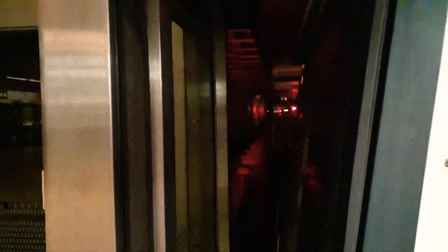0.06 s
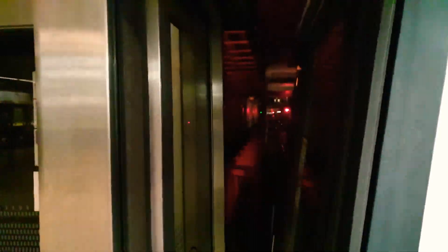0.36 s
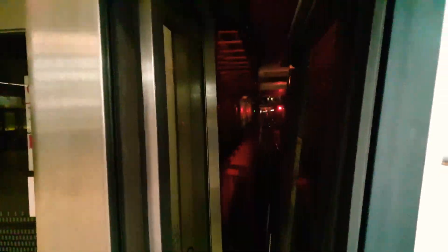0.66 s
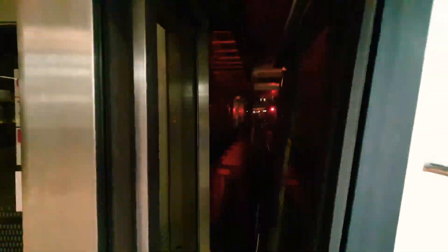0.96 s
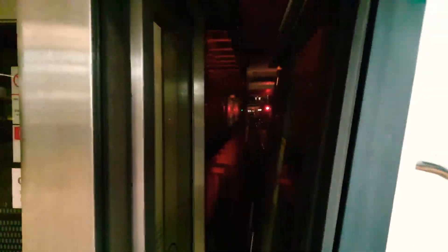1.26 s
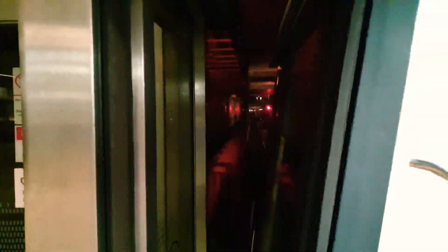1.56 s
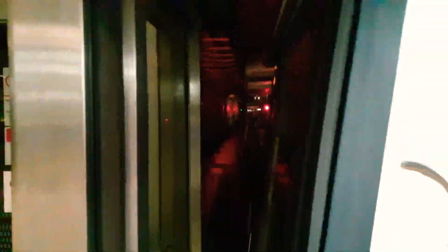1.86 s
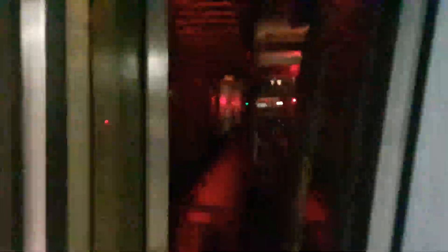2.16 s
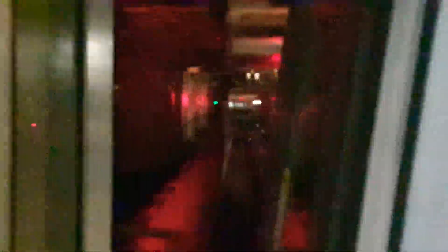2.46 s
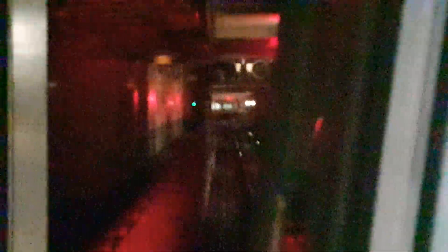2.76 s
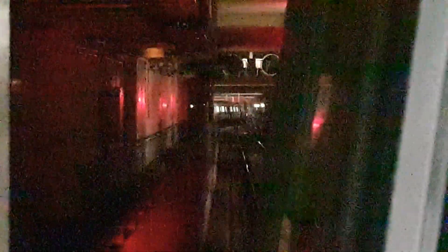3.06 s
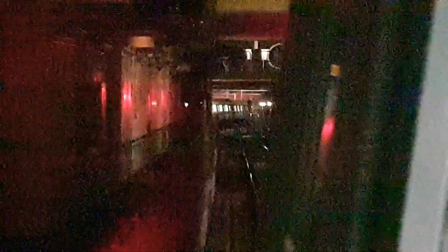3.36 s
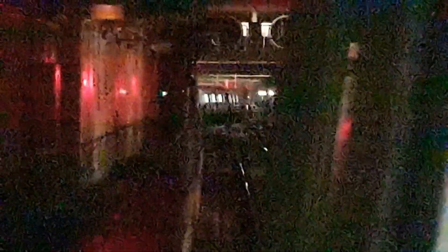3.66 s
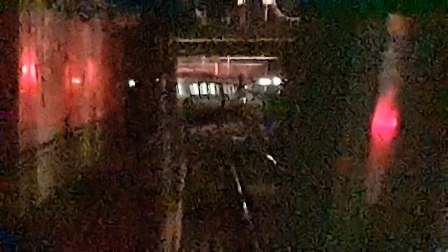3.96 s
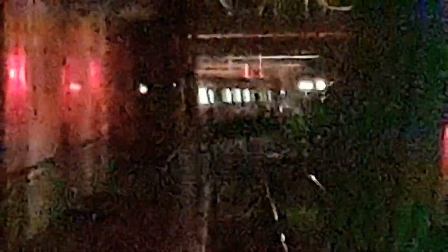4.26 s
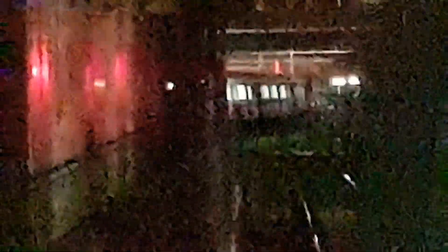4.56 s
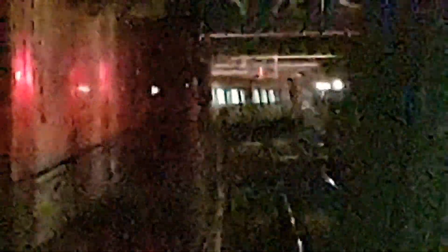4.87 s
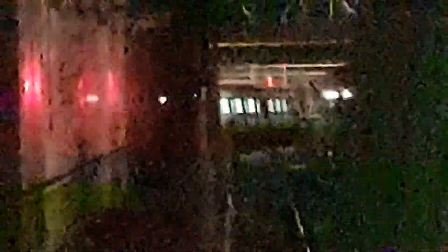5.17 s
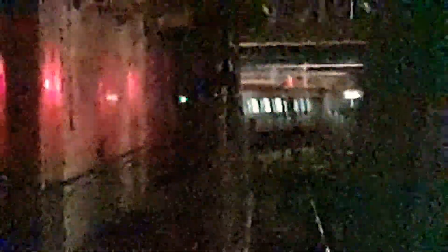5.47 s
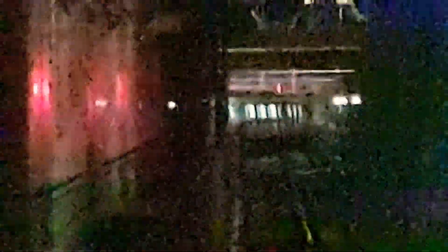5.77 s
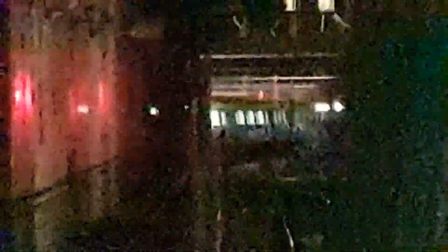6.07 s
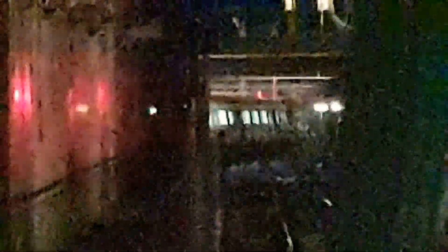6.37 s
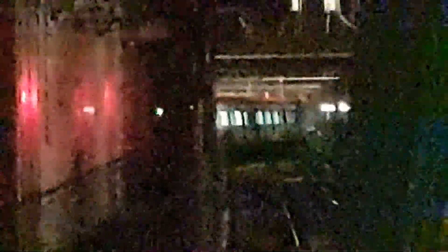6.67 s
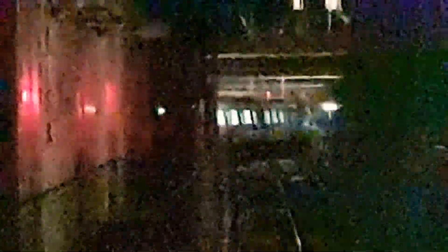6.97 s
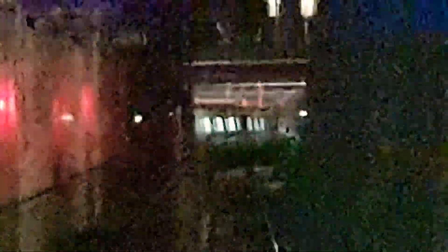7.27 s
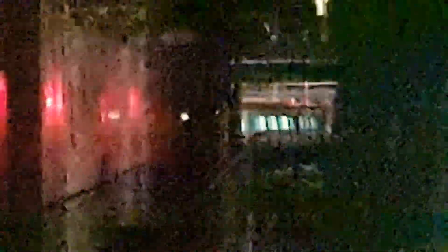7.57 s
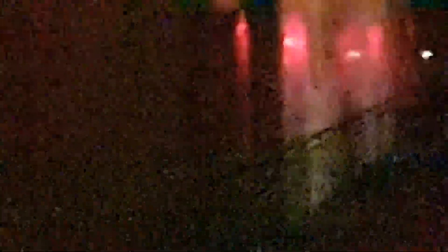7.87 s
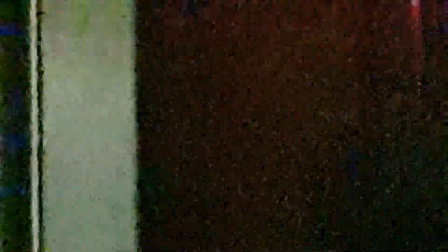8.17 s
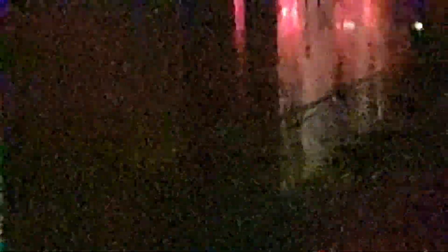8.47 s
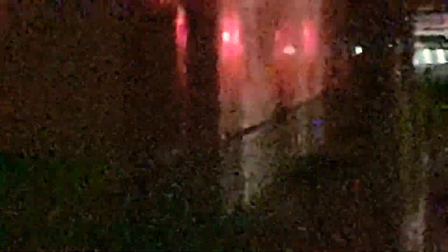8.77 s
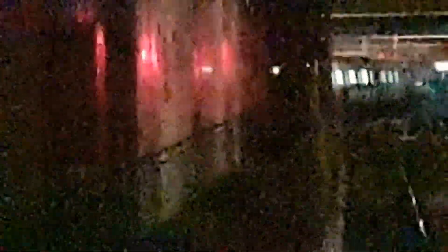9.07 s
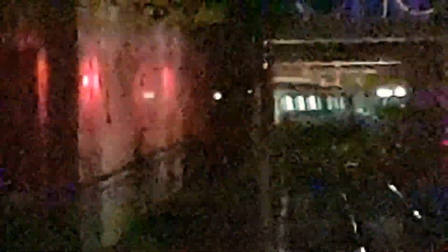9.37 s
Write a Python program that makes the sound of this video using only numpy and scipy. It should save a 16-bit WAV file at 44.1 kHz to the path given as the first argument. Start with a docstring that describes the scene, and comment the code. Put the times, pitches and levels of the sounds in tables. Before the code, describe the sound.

An electric metro train stands at an underground platform, heard from close beside a car. Its fans roar throughout, swelling gently about every two seconds over a low compressor drone and faint steady machine tones. A thin, high electrical whistle and sizzle waver, mostly on the right. Faint hissing scuffs come early. The drone grows from about four seconds, the clearest scuff comes near six, and a few more follow toward the end.

```python
"""An electric metro train stands at an underground platform, heard from beside a car. From the start,
turbulent fan air roars in slow surges over a compressor's drone and steady machine tones, while an
inverter sizzles and whistles at 8 kHz, louder and softer as the listener crosses its standing waves.
Faint hissing scuffs come from the right in the first seconds. After about 4 s the drone grows steadily;
near 5.8 s comes the strongest scuff, and more follow from 7 s on."""
import sys
import numpy as np
from scipy import signal
from scipy.fft import rfft, irfft, next_fast_len
from scipy.io import wavfile

SR = 44100
rng = np.random.default_rng(int(sys.argv[2]) if len(sys.argv) > 2 else 0)


def waveform_to_disk(signal):
    """Save audio, clipped to [-1, 1], as 16-bit WAV at the path in sys.argv[1]."""
    frames = np.transpose(np.atleast_2d(signal))
    scaled = np.clip(frames, -1, 1) * 32767
    samples = np.round(scaled).astype(np.int16)
    wavfile.write(sys.argv[1], SR, samples)


N = 415855
TIME = np.arange(N) / SR
FFT_SIZE = next_fast_len(N)
FREQS = np.maximum(np.arange(FFT_SIZE // 2 + 1) * SR / FFT_SIZE, 1)
EAR_SIGN = np.array([[1], [-1]])  # left, right
SHAFT_HZ = 24.35

# Base spectra of the fans' roar and the air's hiss. Each row: frequency in Hz, density in dB per Hz.
ROAR_SPECTRUM = [(15, -71), (30, -63), (48, -50), (62, -44.5), (85, -47), (115, -52), (145, -51.5),
                 (200, -45.5), (280, -47), (360, -53.5), (460, -58.5), (620, -57), (800, -61.5),
                 (1200, -66.5)]
HISS_SPECTRUM = [(1500, -70.5), (1900, -70), (2600, -78.5), (3800, -84), (5000, -90), (6000, -89.5),
                 (8600, -91.4), (9200, -90.5), (9700, -94), (12000, -94.5), (13700, -100.5), (14150, -92),
                 (14700, -100.8), (15600, -103.8)]
# Likeness of the fan noise at the two ears. Each row: frequency in Hz, correlation from -1 to 1.
EAR_COHERENCE = [(60, 0.65), (99, 0.94), (160, 0.95), (270, 0.99), (450, 0.86), (740, 0.89), (1220, 0.35),
                 (2010, 0.32), (3330, 0.11), (5500, 0.048), (9080, -0.01), (15000, -0.2)]
# Balance of the fan noise. Each row: frequency in Hz, left minus right level in dB.
EAR_BALANCE = [(60, 0.5), (200, -0.5), (500, 0.5), (1200, -0.5), (1900, -2.3), (3800, -3.5), (5200, -0.5),
               (9000, -2), (15000, -2)]
# Modes of the gap between car and wall. Each row: frequency in Hz, width in Hz, gain in dB (a null if < 0).
GAP_RESONANCES = [(210, 12.5, 3.5), (227, 16.3, -1.5), (265, 4.6, 4.3), (321, 15, 3), (562, 24, 1)]
# Fan surges, about 1.8 s apart. Each row: crest in seconds, width in seconds, roar and rush lifts in dB.
FAN_SURGES = [(-.1, .45, 2.5, 3.5), (1.65, 0.5, 4.2, 4.5), (3.25, 0.75, 4, 4), (5.15, 0.8, 3.5, 4),
              (6.9, 0.75, 4, 5), (8.62, 0.52, 3, 3.5)]
# Course of the tunnel's rumble. Each row: time in seconds, relative level in dB.
RUMBLE_LEVELS = [(0.0, -27), (1.25, -29), (1.7, -30.5), (2.56, -29), (3.96, -34), (4.31, -38),
                 (7.37, -32.5), (8.02, -39), (9.42, -38)]
# The inverter's whistle at each ear. Each row: time in seconds, relative level in dB.
WHISTLE_LEFT_LEVELS = [(0.0, -52.0), (0.39, -63.5), (2.01, -56.0), (2.57, -59.5), (2.96, -46.5),
                       (3.87, -59.0), (4.01, -53.5), (5.26, -60.0), (5.6, -51.5), (5.87, -59.5),
                       (8.46, -52.0), (9.42, -56.5)]
WHISTLE_RIGHT_LEVELS = [(0.0, -66), (0.46, -42), (0.91, -58), (1.2, -45.5), (1.37, -54.5), (2.74, -42.5),
                        (2.86, -49), (3.25, -47), (3.43, -43), (3.72, -56), (4.28, -47), (4.45, -42.5),
                        (4.8, -39), (5.02, -47.5), (5.26, -38), (6.51, -59), (7.29, -43), (7.88, -47.5),
                        (8.05, -43), (8.22, -52), (8.34, -41), (8.56, -59), (9.23, -44), (9.42, -50)]
# Spectrum of the inverter's sizzle. Each row: frequency in Hz, relative level in dB.
SIZZLE_SPECTRUM = [(5600, -18), (6250, -9), (6750, 0), (7500, 2), (8000, 1), (8300, -17), (8700, -32)]
# Compressor harmonics. Each row: multiple of the shaft rate, level in dB relative to the mean hum.
SHAFT_HARMONICS = [(2, -12), (4, -8.5), (5, -41)]
# Fan blade and transformer tones. Each row: frequency in Hz, left and right relative levels in dB.
STEADY_TONES = [(154.5, -41, -42), (285.5, -43, -42), (780.6, -47.5, -46), (831.7, -59, -52),
                (880.2, -49, -53), (905.7, -59, -52), (930, -52, -64), (1004, -54, -52), (1028.2, -53, -58),
                (1382.2, -55, -55), (1690.4, -64, -56), (2030.9, -71, -63), (2800.7, -67, -64),
                (4049.6, -74, -71), (4150.5, -80, -72), (7699.5, -71, -68), (11781.4, -84, -78),
                (11876.9, -80, -71), (11972.5, -82, -77), (12066.7, -80, -76), (12162.2, -76, -70)]
# Scuffs. Each row: peak time, rise and 60 dB decay time in seconds, nominal peak level in dB,
# lower and upper band edges in Hz.
SCUFF_BURSTS = [(.105, .04, .2, -52, 6000, 15000), (.23, .008, .1, -49, 3500, 5530),
                (.69, .002, .012, -44, 9500, 13000), (.82, .004, .03, -43, 3500, 6500),
                (2.40, .07, .5, -47, 3000, 12000), (5.838, 0.004, 0.14, -36.5, 2400, 13000),
                (5.88, 0.026, 0.51, -38.5, 1300, 15000), (7.2, .06, .35, -52, 9000, 13000),
                (7.792, .005, 0.26, -37, 7100, 8100), (7.797, .008, .6, -53, 10200, 10800),
                (7.87, .05, .3, -48, 5000, 14000), (8.2, 0.081, 0.41, -44, 3500, 12500),
                (8.265, 0.023, 0.45, -42, 3000, 14000), (8.99, 0.054, .4, -50, 5030, 6600)]


def fans(left_lead_s=.00008):
    """Turbulence radiates broadband noise; in a hard tunnel it is coherent in the bass, diffuse above."""
    mid, side = white_spectra()
    coherence = np.clip(across_hz(EAR_COHERENCE), -.99, .99)
    air = (np.sqrt(1 + coherence) * mid + EAR_SIGN * np.sqrt(1 - coherence) * side) / np.sqrt(2)
    base_db = across_hz(list(ROAR_SPECTRUM) + list(HISS_SPECTRUM))
    modes_db = sum(db / (1 + (2 * (FREQS - hz) / width) ** 2) for hz, width, db in GAP_RESONANCES)
    air = air * from_db(base_db + modes_db + EAR_SIGN * across_hz(EAR_BALANCE) / 2)
    air = air * np.exp(1j * np.pi * EAR_SIGN * FREQS * left_lead_s)
    rumble = unit_rms(from_db(in_time(RUMBLE_LEVELS)))
    roar, rush, hiss = surge_gains()
    low, middle, high, top = (1 / (1 + (FREQS / hz) ** 8) for hz in (68, 132, 390, 950))  # crossovers
    return (waveform(air * low) * rumble
            + waveform(air * (middle - low))
            + waveform(air * (high - middle)) * roar
            + waveform(air * (top - high)) * rush
            + waveform(air * (1 - top)) * hiss)


def surge_gains(roar_lag_s=0.084, hiss_share=0.18, rush_db_per_s=-0.31):
    """Slow amplitude modulation: each surge lifts the midrange rush and the hiss, then the low roar."""
    roar_db = rush_db = 0
    for crest, width, roar_lift, rush_lift in FAN_SURGES:
        roar_db += roar_lift * np.exp(-((TIME - crest - roar_lag_s) / width) ** 2)
        rush_db += rush_lift * np.exp(-((TIME - crest) / width) ** 2)
    return [unit_rms(from_db(db)) for db in (roar_db, rush_db + rush_db_per_s * TIME, hiss_share * rush_db)]


def inverter(switching_hz=8000, fade_hz=6.7, flutter=0.091, periodic_share=0.2, swell_above_db=-36.0):
    """Standing waves make the switching tone fade differently at each ear; a sizzle lies under it."""
    level_db = np.array([in_time(WHISTLE_LEFT_LEVELS) + 2 * drift(fade_hz),
                         in_time(WHISTLE_RIGHT_LEVELS) + drift(fade_hz)])
    tone = np.zeros((2, N))
    for ear in range(2):
        phase = wandering_phase(switching_hz, wander_hz=1.267) + flutter * drift(25)
        tone[ear] = np.sin(phase) * (1 + flutter * drift(23))
    whistle = np.sqrt(2) * tone * from_db(level_db + 4)
    # part of the sizzle repeats with each turn of the shaft
    period = round(SR / SHAFT_HZ)
    periodic = rng.standard_normal((2, period))[:, np.arange(FFT_SIZE) % period]
    aperiodic = rng.standard_normal((2, FFT_SIZE))
    ripple = np.sqrt(periodic_share) * periodic + np.sqrt(1 - periodic_share) * aperiodic
    sizzle = unit_rms(waveform(rfft(ripple) * from_db(across_hz(SIZZLE_SPECTRUM))))
    # it holds a diffuse floor, rising only if the whistle's level passes the threshold
    sizzle_db = -48.5 + 0.2 * np.maximum(level_db - swell_above_db, 0)
    return whistle + to_right(sizzle * from_db(sizzle_db), left_db=-5)


def compressor(motor_hz=73.9, grows_at_s=4.26, growth_db_per_s=1.04):
    """Rotation gives shaft harmonics and a motor hum, whose standing wave shifts between the ears."""
    hum_db = -29.9 + growth_db_per_s * np.maximum(TIME - grows_at_s, 0) + 0.5 * drift(0.5)
    shaft_phase = wandering_phase(SHAFT_HZ, wander_hz=0.083)
    motor_phase = wandering_phase(motor_hz, wander_hz=0.54) + 0.15 * drift(1.0) * EAR_SIGN
    drone = from_db(hum_db) * np.sin(motor_phase)
    for order, db in SHAFT_HARMONICS:
        harmonic_db = hum_db.mean() + db + 0.5 * drift(0.83)
        drone += from_db(harmonic_db) * np.sin(round(order) * shaft_phase)
    return to_right(np.sqrt(2) * drone, left_db=-2)


def machine_tones(scatter=0.73, fade_hz=2.26, blades_below_hz=1500):
    """Interference of direct sound and shifting reflections fades each tone differently at each ear."""
    out = np.zeros((2, N))
    _, rush, _ = surge_gains()
    for hz, *ear_db in STEADY_TONES:
        phase = wandering_phase(hz, wander_hz=0.428)
        surge = rush ** 0.49 if hz < blades_below_hz else 1  # blade tones ride the surges
        direct, quadrature = surge * np.sin(phase), surge * np.cos(phase)
        for ear, db in enumerate(ear_db):
            reflected = scatter * (direct * drift(fade_hz) + quadrature * drift(fade_hz))
            out[ear] += from_db(db + 2) * unit_rms(direct + reflected)
    return out


def scuffs(grain_db=1.5, dull_above_hz=3500):
    """Friction makes grainy bursts of band-limited hiss that swell, then decay exponentially."""
    out = np.zeros((2, N))
    pole = np.exp(-2 * np.pi * dull_above_hz / SR)
    for peak_s, rise, t60, db, low_hz, high_hz in SCUFF_BURSTS:
        since_peak = TIME - peak_s
        active = (since_peak > -3 * rise) & (since_peak < t60)
        t = since_peak[active]
        envelope = np.where(t < 0, np.exp(-(t / rise) ** 2), from_db(-60 * np.abs(t) / t60))
        band = signal.butter(2, [low_hz, high_hz], "band", fs=SR, output="sos")
        friction = signal.lfilter([1], [1, -pole], rng.standard_normal((2, 2 * SR)))
        hiss = unit_rms(signal.sosfilt(band, friction))
        out[:, active] += from_db(db) * envelope * hiss[:, :len(t)]
    return to_right(out * from_db(grain_db * drift(60)), left_db=-4)


def to_right(sound, left_db):
    """Interaural level difference: a weaker left ear places the sound to the right."""
    return sound * from_db([[left_db], [0]])


def wandering_phase(hz, wander_hz):
    """Phase is the integral of frequency, here a slightly unsteady one."""
    return 2 * np.pi * (np.cumsum(hz + wander_hz * drift(0.92)) / SR + rng.random())


def drift(rate_hz):
    """Low-pass filtering turns white noise into a smooth random fluctuation of rms 1."""
    step, settling = 100, 2000
    pole = np.exp(-2 * np.pi * rate_hz * step / SR)
    noise = rng.standard_normal(N // step + settling + 2)
    slow = signal.lfilter([1], [1, -2 * pole, pole * pole], noise)[settling:]
    return np.interp(np.arange(N) / step, np.arange(len(slow)), unit_rms(slow))


def white_spectra():
    """Two uncorrelated white noises, as spectra of 0 dB per Hz."""
    return rfft(rng.standard_normal((2, FFT_SIZE))) * np.sqrt(SR / 2)


def waveform(spectrum):
    """The inverse Fourier transform, cut to N samples."""
    return irfft(spectrum, FFT_SIZE)[..., :N]


def across_hz(rows):
    """Interpolation over log frequency, at every bin."""
    hz, value = np.transpose(rows)
    return np.interp(np.log(FREQS), np.log(hz), value)


def in_time(rows):
    """Linear interpolation over time, at every sample."""
    return np.interp(TIME, *np.transpose(rows))


def from_db(db):
    """Amplitude grows tenfold for every 20 dB."""
    return 10 ** (np.asarray(db) / 20)


def unit_rms(x):
    """Normalisation to a mean power of 1."""
    return x / np.sqrt(np.mean(x ** 2) + 1e-20)


def scene():
    """Superposition: the pressures of all sources add at each ear."""
    return fans() + compressor() + machine_tones() + inverter() + scuffs()


def record(dry):
    """Band limiting: a steep elliptic low-pass removes the highest treble."""
    cutoff_hz = 15730
    return signal.sosfilt(signal.ellip(12, .1, 90, cutoff_hz, fs=SR, output="sos"), dry)


dry = scene()
out = record(dry)
waveform_to_disk(out)
```